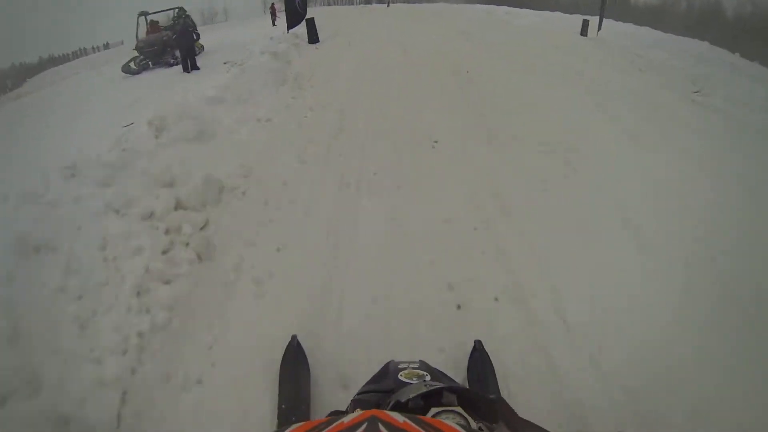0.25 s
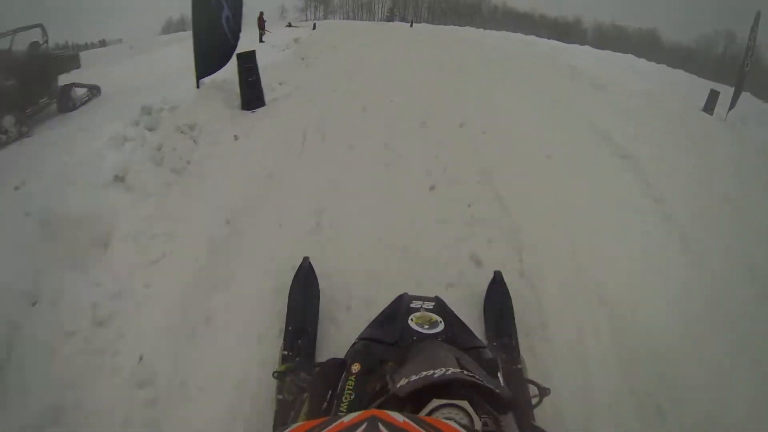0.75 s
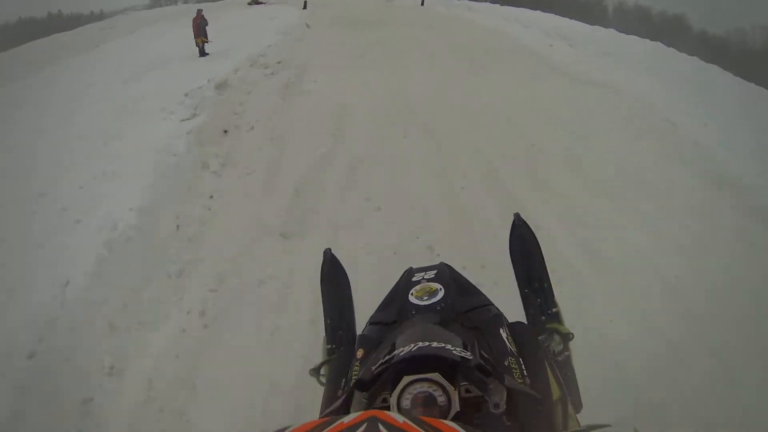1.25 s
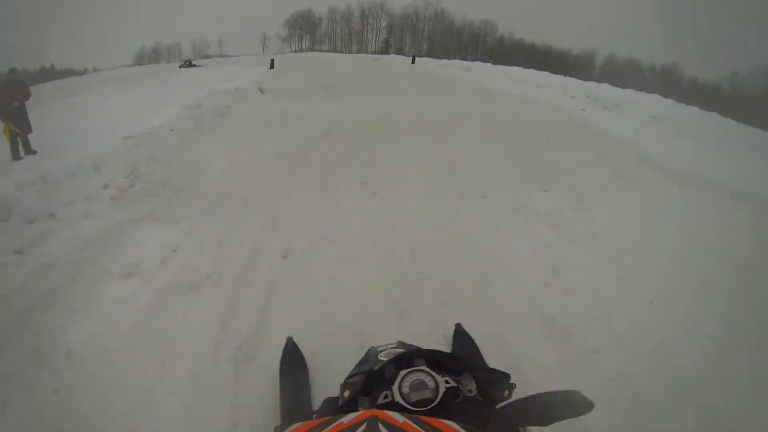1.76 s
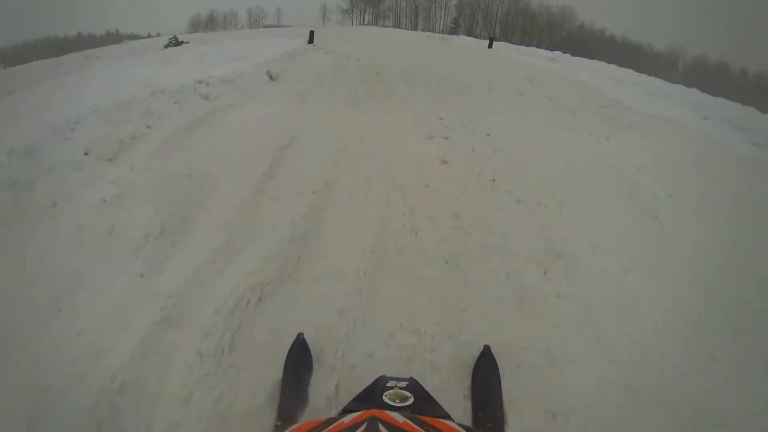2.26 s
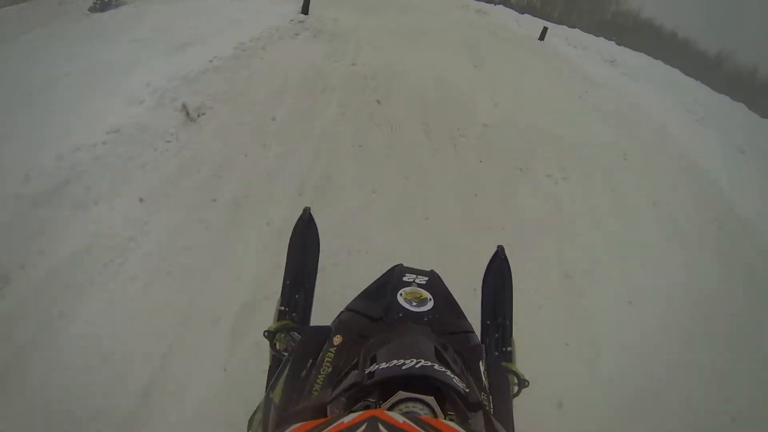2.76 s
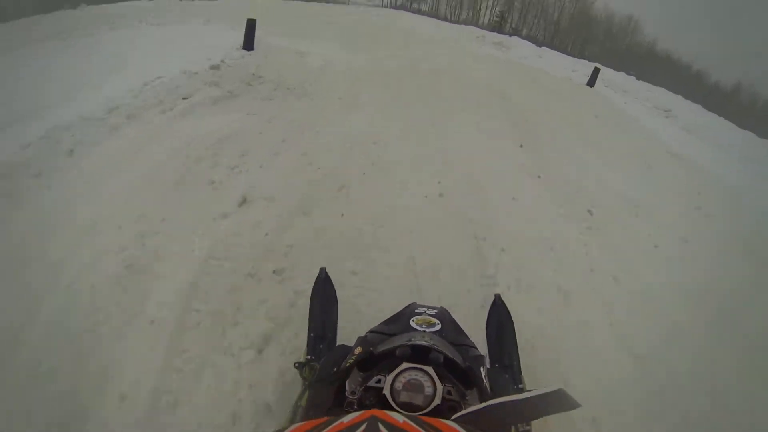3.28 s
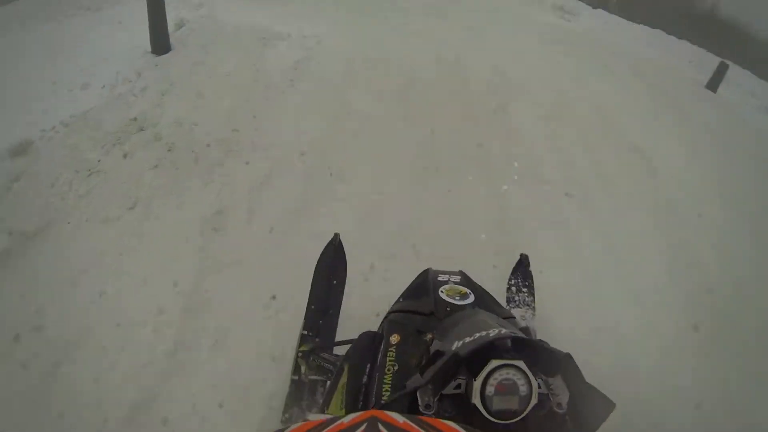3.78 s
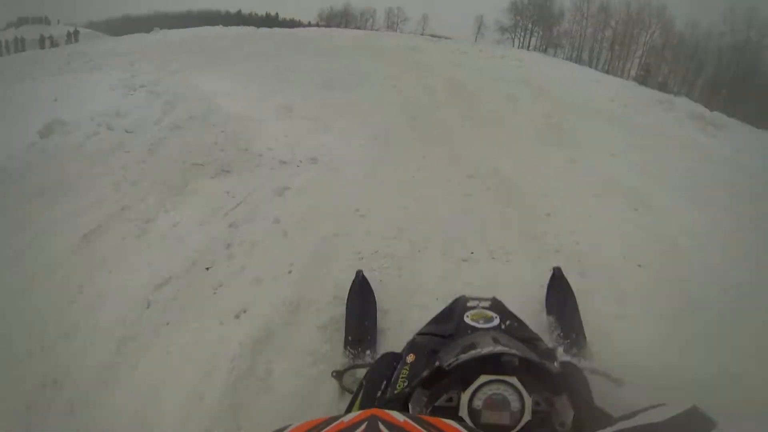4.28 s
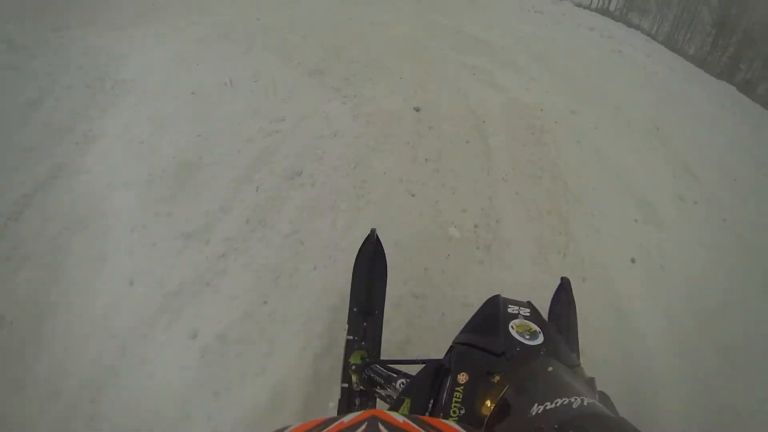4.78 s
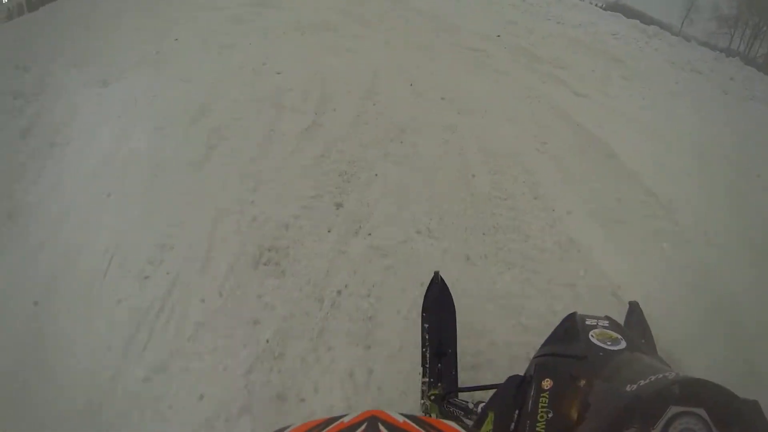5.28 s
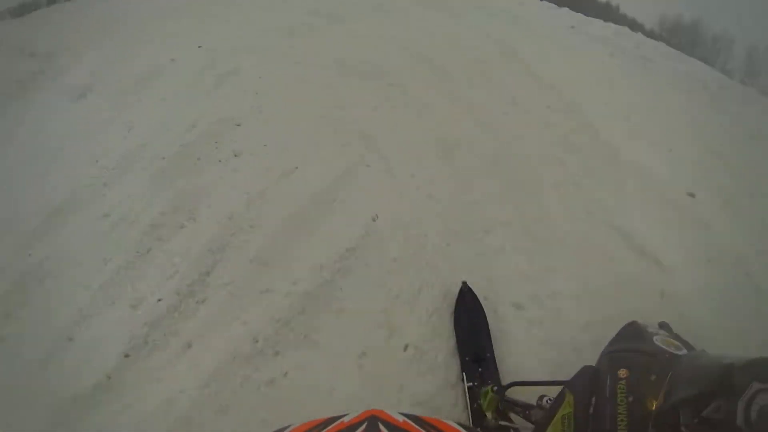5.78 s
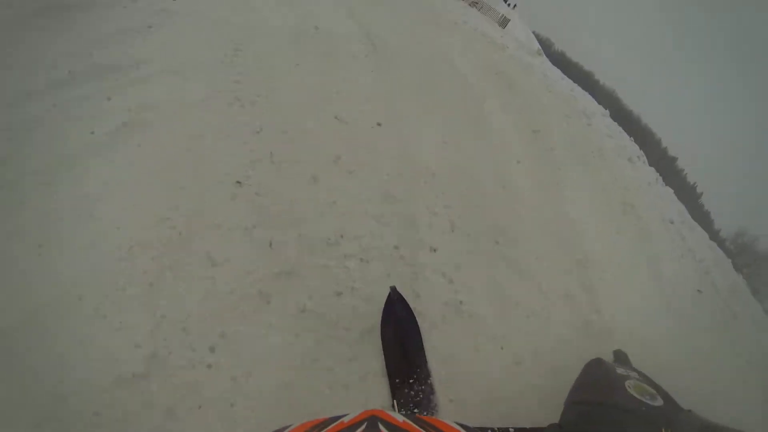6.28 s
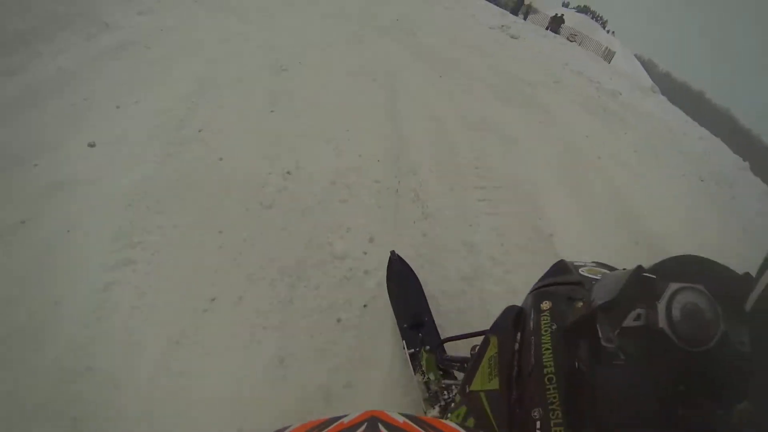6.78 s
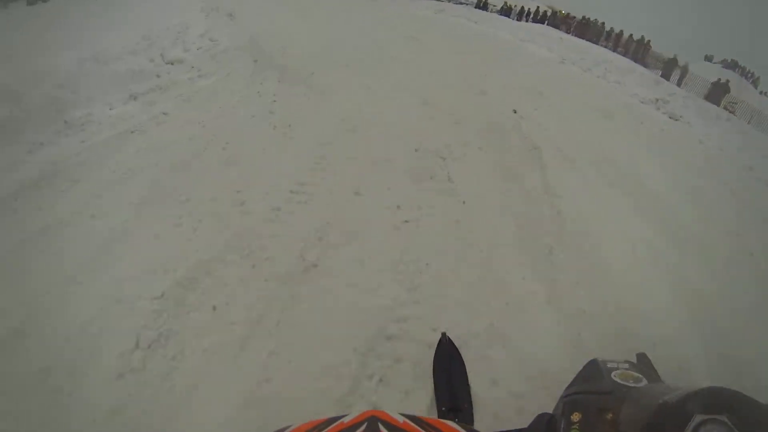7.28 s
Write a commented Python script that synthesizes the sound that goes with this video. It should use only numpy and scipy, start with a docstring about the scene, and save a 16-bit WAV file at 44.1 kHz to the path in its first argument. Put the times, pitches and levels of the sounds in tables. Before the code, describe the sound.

Close, boxy and buzzing, a two-stroke snowmobile engine climbs in pitch and falls away about ten times as the throttle opens and shuts. A whine rises with each surge over a steady clatter from the running track. Low wind buffets the helmet microphone throughout, and the skis and suspension knock on the snow, hardest about halfway through, when a heavy thump briefly dips the sound.

```python
"""A two-stroke twin snowmobile races over a bumpy snow track, heard from a cased camera on the rider's helmet.
The throttle opens and shuts; firings drone in the pipe and rasp in the engine, track and chassis rattle, and the case
rings near 1.5 kHz, where single harmonics sing out as a whine. Wind and bumps shake the helmet; one hard landing makes the limiter duck."""
import sys
import numpy as np
from scipy import signal
from scipy.fft import rfft, irfft
from scipy.io import wavfile
from scipy.ndimage import uniform_filter1d, minimum_filter1d

SR = 44100
rng = np.random.default_rng(int(sys.argv[2]) if len(sys.argv) > 2 else 0)


def transcribe(u):
    """Save the signal u as a 16-bit wav file named by the first command-line argument.

    u: samples, shape (n,) or (channels, n), limited to [-1, 1]; the rate is SR.
    q: integer samples, one column per channel.
    """
    v = np.clip(np.atleast_2d(u).T, -1, 1)
    q = np.round(v * 32767).astype(np.int16)
    wavfile.write(sys.argv[1], SR, q)


N = 332500

# wind on the helmet: (s, level dB)
WIND = [(0.0, -23.5), (0.27, -28.5), (0.55, -22.5), (1.01, -27), (1.66, -31), (1.78, -27), (2.25, -24.5), (2.98, -33.5),
        (3.38, -29.5), (3.65, -31.5), (4.35, -30.5), (4.47, -32), (4.74, -35), (4.98, -28), (5.44, -32), (5.67, -25),
        (6.05, -28.5), (7.54, -31.5)]
# bumps that jolt the helmet: (s, size dB, pitch Hz, t60 s)
BUMPS = [(.022, -1.5, 51.3, 0.098), (0.309, -14, 74, 0.45), (.603, -2, 59.7, 0.058), (1.722, 1.5, 25.75, 0.11), (1.828, -1.5, 32, 0.11), (1.884, 3, 42.35, 0.048), (1.944, -6, 57.9, 0.17), (3.411, 15.5, 39.7, 0.048), (3.452, 29.5, 47, 0.029), (3.633, 0, 52.06, 0.064), (4.168, 3, 27.7, 0.07), (4.883, -6.5, 54, 0.14), (5.737, -11, 73.6, 0.18), (6.975, -10, 80, 0.12), (7.47, -9.5, 24.57, 0.16)]
# knocks of skis and suspension: (s, peak dB, t60 s, centre Hz)
KNOCKS = [(1.591, -12, 0.057, 1460), (2.659, -3.5, 0.067, 1611), (3.405, 0, 0.06, 1554), (3.453, 10, .012, 1850), (4.255, -12, 0.048, 1594), (4.947, -19, 0.06, 3050), (4.991, -17.5, 0.042, 2730), (5.064, -12, 0.052, 1612), (5.089, -13, 0.043, 1496), (5.707, 0, 0.078, 1457), (5.713, -8, 0.038, 1856), (5.883, -14, 0.041, 1546), (7.016, 0.5, 0.2, 1570)]
# low orders of the exhaust: (multiple of the shaft rate, dB)
ORDERS = [(1, -22.5), (2, -0.5), (3, -17.5), (4, -18.5), (5, -28.5), (6, -28.5)]
# resonances of the camera case: (Hz, width Hz, lift dB)
CASE = [(471, 180, 6), (1095, 190, 3), (1449, 291, 15), (1668, 206, 12.5), (2810, 170, 2.5), (3210, 470, 3.5), (4580, 1460, 6), (7820, 1500, 7.5), (10620, 1800, 7)]
# spectra before the case: (Hz, dB)
FIRING = [(150, -57), (400, -43), (600, -26), (850, -22.5), (1050, -16.5), (1300, -11), (2100, -6.5), (3200, -14), (3800, -22.5), (5500, -30.5), (9000, -36.5), (15000, -50)]
CLATTER = [(60, 10), (160, -18), (280, -8.5), (420, -7.5), (600, -17.5), (880, -20), (1250, -15), (2200, -11), (3600, -19), (6000, -27), (9500, -40.5), (15000, -44.5)]
BUFFET = [(10, -8), (22, -2), (35, -3), (52, -6), (66, -2), (76, 6), (87, -5), (100, -12), (140, -15), (250, -24), (450, -33), (900, -57), (3000, -90)]  # fixed
WHISTLE_HZ, WHISTLE_DB = 10800, -77
TOP_HZ = 14800  # fixed
T = np.arange(N) / SR
BINS = np.maximum(np.fft.rfftfreq(N, 1 / SR), 1)
# pulls on the throttle: (opens s, shuts s, shaft speed at opening Hz, climb Hz per s, top speed Hz, run-down time s, drone dB, rasp dB, treble dB, whine dB)
PULLS = [(.10, .407, 76.21, 158.6, 128.9, 0.66, 0, 1.5, -1, -3.5),
         (.53, 1.04, 108.8, 90.63, 143.9, 0.35, 1.5, -0.5, -1, -0.5),
         (1.79, 2.535, 69.44, 193.1, 141.1, 0.36, 0, -0.5, -1.5, -0.5),
         (3.039, 3.288, 64.22, 178, 115.4, 0.52, 1.5, -0.5, 1, -4),
         (3.52, 3.886, 102.2, 184.1, 141.7, .39, -1.5, -1, 1, -3),
         (4.22, 4.70, 69.45, 186.4, 142, 0.29, 1, -0.5, 1.5, -0.5),
         (5.06, 5.528, 64.3, 182.6, 140.3, .324, 1.5, 0.5, 1, -2.5),
         (5.93, 6.214, 73.9, 168.5, 122.8, 0.55, 1.5, -1, 1.5, -1.5),
         (6.301, 6.754, 112.4, 159, 143.7, 0.36, 2.5, 3, 1, 0.5),
         (6.98, 7.6, 83.35, 155.4, 142.6, .4, 2.5, 2.5, -0.5, 0.5)]
START_HZ, IDLE_HZ, FULL_HZ = 81, 35, 139.3  # shaft speeds: at first, where a run-down heads, and flat out
OVERRUN_S, THROTTLE_LAG_S = .02, 0.073  # the shaft keeps its speed after a shut; the load takes time to change
BOG_S, BOG_WIDTH_S, BOG_HZ = 2.38, .075, 6  # once the engine bogs briefly under full load
VALVE_HZ, VALVE_SPREAD_HZ = 139.3, 2.5  # shaft speed at which the exhaust valves open
# levels flat out, and what load, shaft speed and open valves add to them
RASP_DB, RASP_LOAD_DB, RASP_DB_PER_HZ = -22, 1.5, 0.13
TREBLE_DB, TREBLE_LOAD_DB, TREBLE_VALVE_DB = -19.5, 1.5, 4.5  # relative to the rasp
DRONE_DB, DRONE_LOAD_DB, DRONE_VALVE_DB = -22.5, 10.5, -3
DRONE_DB_PER_HZ, COAST_DB_PER_HZ = 0.0838, 0.2
COG_HZ, COG_DB, COG_DB_PER_HZ, SLED_LAG_S, UPSHIFT = 235.4, -36, 0.1, .12, 1.5  # track flat out; its lag and the belt drive's power law
# narrow resonances of pipe and hood: (Hz, width Hz, level of a harmonic on it dB, gain with the head turned dB)
HOOD = [(1117, 97, -37.5, 0), (1287, 57, -37, 12), (1448, 58, -33, 11), (1652, 100, -23.5, -1.5), (2128, 99, -37, 3),
        (2380, 75, -42.5, 0), (2563, 62, -43.5, 8.5), (2855, 140, -44, 3.5), (3145, 80, -44.5, 9), (3405, 110, -47, 3),
        (4020, 140, -46.5, -5), (4300, 90, -48, -10), (4600, 130, -47, 5), (5130, 98, -49, 0), (5720, 90, -66, 2)]
# the rider turns his head into the last bend: (s, share turned 0-1)
HEAD = [(4.6, 0), (5.5, .45), (6.2, 0.51), (6.6, 1), (7.0, 0.54), (7.54, 0.4)]


def undb(db):
    """Decibels to gain."""
    return 10 ** (np.asarray(db) / 20)


def curves(table):
    """Each column of a table, joined by straight lines in time."""
    s, *columns = np.transpose(table)
    return [np.interp(T, s, c) for c in columns]


def unit(x):
    """Scale to rms 1."""
    return x / np.std(x)


def power(x, span_s=0.048):
    """Running mean square."""
    size = max(int(span_s * SR), 2)
    return uniform_filter1d(uniform_filter1d(x * x, size), size) + 1e-14


def walk(rate):
    """Slow chance with a spread near 1."""
    size = int(SR / rate)
    steps = np.repeat(rng.standard_normal(N // size + 1), size)
    return unit(uniform_filter1d(uniform_filter1d(steps, size), size)[:N])


def colour(x, points):
    """Filter by a spectrum of (Hz, dB) points."""
    hz, db = np.transpose(points)
    return irfft(rfft(x) * undb(np.interp(np.log(BINS), np.log(hz), db)), N)


def band(x, lo, hi):
    """Keep one band, with steep edges."""
    return irfft(rfft(x) / (1 + (lo / BINS) ** 16) / (1 + (BINS / hi) ** 16), N)  # fixed


def case(x):
    """The closed camera case lifts the sound at its resonances."""
    db = sum(lift * 2 ** -((2 * (BINS - hz) / width) ** 2) for hz, width, lift in CASE)
    return irfft(rfft(x) * undb(db), N)


def clicks(times, sizes):
    """Band-limited pulses that fall between samples."""
    at = times[:, None] * SR
    taps = np.floor(at).astype(int) + np.arange(-7, 9)  # fixed
    shape = np.sinc(taps - at) * np.sinc((taps - at) / 8)  # fixed
    inside = (taps >= 0) & (taps < N)
    return np.bincount(taps[inside], (sizes[:, None] * shape)[inside], N)


def panels(x, t60, ripple=.4):
    """Dense reflections under the hood smear each pulse and ripple its spectrum."""
    response = rfft(rng.standard_normal(N) * undb(-60 * np.minimum(T / t60, 3)))  # fixed
    return unit(irfft(rfft(x) * response * np.abs(response) ** (ripple - 1), N))


def engine(turns, throttle, jitter_s=.000005, coast_jitter_s=.00008, scatter_db=3.0, coast_scatter_db=3, second_db=-12, gas_db=-14):
    """Two firings a turn, one cylinder louder; they come evenly under load and stumble off throttle."""
    number = np.arange(1, int(2 * turns[-1]))
    times = np.interp(number / 2, turns, T)
    slack = 1 - np.interp(times, T, throttle)
    late, strong = rng.standard_normal((len(number), 2)).T
    sizes = undb(second_db * (number % 2) + (scatter_db + coast_scatter_db * slack) * strong)
    pulses = clicks(times + (jitter_s + coast_jitter_s * slack) * late, sizes)
    # the rider's head moves between two sound paths, so single harmonics swell and fade
    lean = 5 * T + 0.66 * walk(6)
    near, far = (panels(pulses, t60=.075, ripple=.7) for _ in range(2))  # fixed
    ring = np.cos(lean) * near + np.sin(lean) * far
    # a puff of gas hisses after each firing
    gas = unit(rng.standard_normal(N) * np.exp(-(2 * turns % 1) / 0.48))
    return case(colour(ring / np.sqrt(power(ring)) + undb(gas_db) * gas, FIRING))


def chassis(count=6000, spread_db=0.0, flutter_db=2.0):
    """Track, clutch and skis clatter: dense small impacts over a scraping hiss."""
    when, size = rng.random((count, 2)).T
    impacts = clicks(when * N / SR, undb(-spread_db * np.log(1 - size * .995)))  # fixed
    rattle = panels(impacts - impacts.mean(), t60=0.012, ripple=0.12) + 1.56 * rng.standard_normal(N)
    return case(colour(rattle * undb(flutter_db * walk(45)), CLATTER))


def machine(turns, shaft_hz, throttle, valves, rasp_db, bright_db, coast_db=-1, load_db=10, speed_db=9, ride_db=1):
    """The engine rises over the clatter with load and speed, and the whole grows brighter as the valves open."""
    level_db = RASP_DB + rasp_db + RASP_LOAD_DB * (throttle - 1) + RASP_DB_PER_HZ * (shaft_hz - FULL_HZ) + ride_db * walk(16)
    treble_db = TREBLE_DB + bright_db + TREBLE_LOAD_DB * (throttle - 1) + TREBLE_VALVE_DB * valves
    motor, clatter = (x / np.std(band(x, 1000, 3500)) for x in (engine(turns, throttle), chassis()))  # fixed
    mix = clatter + motor * undb(coast_db + load_db * throttle + speed_db * np.log2(shaft_hz / FULL_HZ))
    treble = band(mix, 3800, SR)  # fixed
    body_power, treble_power = power(band(mix, 1000, 3500), .03), power(band(mix, 4000, 14000), .03)  # fixed
    return undb(level_db) * ((mix - treble) / np.sqrt(body_power) + undb(treble_db) * treble / np.sqrt(treble_power))


def exhaust(turns, shaft_hz, throttle, valves, trim_db, rough_db=1.35, coast_rough_db=3.5, waver_db=2):
    """The tuned pipe drones at the firing rate, with weak overtones that waver; off throttle it sputters away."""
    tone = sum(undb(db + waver_db * (k != 2) * walk(18)) * np.sin(2 * np.pi * (k * turns + rng.random()))
               for k, (_, db) in enumerate(ORDERS, 1))
    rough = (rough_db + coast_rough_db * (1 - throttle)) * walk(70)
    loaded_db = DRONE_DB_PER_HZ * (shaft_hz - FULL_HZ) + DRONE_VALVE_DB * valves
    coasting_db = COAST_DB_PER_HZ * (shaft_hz - FULL_HZ) - DRONE_LOAD_DB
    return np.sqrt(2) * tone * undb(DRONE_DB + trim_db + throttle * loaded_db + (1 - throttle) * coasting_db + rough)


def track(shaft_hz, wobble=0.0187, flutter_db=2.0, overtone_db=-12):
    """The cogs of the track hum at the ground speed, which trails the engine as the belt drive shifts up."""
    hz = COG_HZ * (np.interp(T - SLED_LAG_S, T, shaft_hz) / FULL_HZ) ** UPSHIFT
    phase = 2 * np.pi * np.cumsum(hz * (1 + wobble * walk(40))) / SR
    db = COG_DB + COG_DB_PER_HZ * (hz - COG_HZ) + flutter_db * walk(25)
    return (np.sin(phase) + undb(overtone_db) * np.sin(2 * phase)) * undb(db)


def wind(span_s=0.085, wind_db=2, gust_db=1.5):
    """Gusts buffet the helmet, whose shell booms near 77 Hz."""
    gusts = colour(rng.standard_normal(N), BUFFET)
    return gusts / np.sqrt(power(gusts, span_s)) * undb(curves(WIND)[0] + wind_db + gust_db * walk(10))


def jolts(knock_db=-8):
    """Bumps swing the helmet for a cycle or two; skis and suspension knock through the case."""
    thuds, blows = np.zeros(N), np.zeros(N)
    for s, db, hz, t60 in BUMPS:
        span = np.flatnonzero((T >= s) & (T < s + 2 * t60))
        age = T[span] - s
        # the helmet's padding softens the start of each swing
        thuds[span] += undb(db - 60 * age / t60) * np.sin(2 * np.pi * hz * age) * np.tanh(6 * hz * age) ** 2  # fixed
    shell = case(rng.standard_normal(N))
    for s, db, t60, hz in KNOCKS:
        crack = unit(colour(shell, [(hz / 3, -36), (hz, 0), (hz * 2, -10), (hz * 8, -70)]))  # fixed
        span = np.flatnonzero((T >= s) & (T < s + t60))
        share = (T[span] - s) / t60
        # snow cushions the contact, so each knock takes a moment to build
        blows[span] += undb(db - 60 * share) * np.tanh(8 * share) * crack[span]  # fixed
    # the microphone does not follow the slowest part of a swing
    thuds = signal.sosfilt(signal.butter(1, 8, "high", fs=SR, output="sos"), thuds)  # fixed
    return thuds + undb(knock_db) * blows


def whistle(wobble_hz=14):
    """A faint thin whistle stands high above the rest."""
    return np.sqrt(2) * undb(WHISTLE_DB) * np.sin(2 * np.pi * np.cumsum(WHISTLE_HZ + wobble_hz * walk(55)) / SR)


def singing(turns, shaft_hz, throttle, whine_db, odd_db=-4, load_db=9, db_per_hz=0.17, flutter_db=3.0, drift=0.4, count=41):
    """Harmonics swell as they sweep through a resonance of pipe or hood, and flutter with the ride."""
    grid = np.arange(0, 7000, 5)  # fixed
    ahead = sum(undb(db) * 2 ** -((2 * (grid - hz) / width) ** 2) for hz, width, db, _ in HOOD)
    aside = sum(undb(db + turned_db) * 2 ** -((2 * (grid - hz) / width) ** 2) for hz, width, db, turned_db in HOOD)
    turned = np.clip(curves(HEAD)[0], 0, 1)
    flutter, wander = undb(flutter_db * walk(70)), drift * walk(90)
    out = np.zeros(N)
    for k, shift in enumerate(rng.integers(N, size=count), 1):
        gain = (1 - turned) * np.interp(k * shaft_hz, grid, ahead) + turned * np.interp(k * shaft_hz, grid, aside)
        out += undb(odd_db * (k % 2)) * gain * np.roll(flutter, shift) * np.sin(2 * np.pi * k * turns + np.roll(wander, shift))
    return np.sqrt(2) * out * undb(whine_db + load_db * (throttle - 1) + db_per_hz * (shaft_hz - FULL_HZ))


def per_pull():
    """The drone, rasp, treble and whine trims in dB, gliding from one pull to the next."""
    opens, shuts, *columns = np.transpose(PULLS)
    held = np.ravel([opens, shuts], "F")
    return [np.interp(T, held, np.repeat(c, 2)) for c in columns[-4:]]  # fixed


def shaft(knee_hz=2.5):
    """Each pull winds the engine up evenly until the clutch holds it; then it runs down towards idle."""
    speeds = [START_HZ * (T < PULLS[0][1])]
    for opens, shuts, start_hz, climb, top_hz, run_down_s, *_ in PULLS:
        ends = shuts + OVERRUN_S
        free = start_hz + climb * (np.minimum(T, ends) - opens)
        held = -knee_hz * np.logaddexp(-free / knee_hz, -top_hz / knee_hz)
        speeds.append(IDLE_HZ + (held - IDLE_HZ) * np.exp(-np.maximum(T - ends, 0) / run_down_s))
    bog = BOG_HZ * np.exp(-((T - BOG_S) / BOG_WIDTH_S) ** 2)
    return uniform_filter1d(np.max(speeds, axis=0), size=1300) - bog


def scene(hunt=0.0015):
    """The throttle sets load and shaft speed, which drive engine and track; wind and bumps join them."""
    shaft_hz = shaft() * (1 + hunt * walk(35))
    turns = np.cumsum(shaft_hz) / SR
    held = sum(1. * ((T > opens) & (T < shuts)) for opens, shuts, *_ in PULLS)
    throttle = uniform_filter1d(held, int(THROTTLE_LAG_S * SR))
    valves = throttle * (1 + np.tanh((shaft_hz - VALVE_HZ) / VALVE_SPREAD_HZ)) / 2
    drone_db, rasp_db, bright_db, whine_db = per_pull()
    sled = (machine(turns, shaft_hz, throttle, valves, rasp_db, bright_db) + singing(turns, shaft_hz, throttle, whine_db)
            + exhaust(turns, shaft_hz, throttle, valves, drone_db) + track(shaft_hz))
    return (sled + wind() + jolts() + whistle())[None]


def record(dry, release_db_per_s=85):
    """A limiter drops the gain at once on overload and lets it climb back slowly; the top is cut."""
    over_db = 20 * np.log10(np.maximum(np.abs(dry[0]) / .72, 1))  # fixed
    cut_db = np.maximum.accumulate(over_db + release_db_per_s * T) - release_db_per_s * T
    ahead_db = uniform_filter1d(minimum_filter1d(-cut_db, size=65), size=65)
    return signal.sosfilt(signal.ellip(8, .2, 70, TOP_HZ, fs=SR, output="sos"), dry * undb(ahead_db))


dry = scene()
out = record(dry)
transcribe(out)
```